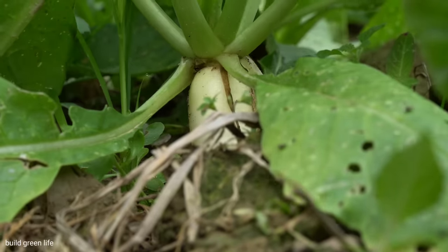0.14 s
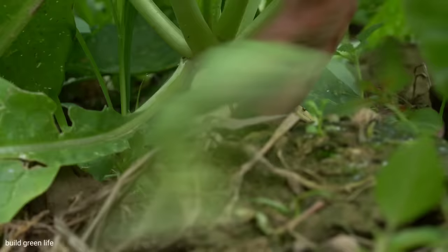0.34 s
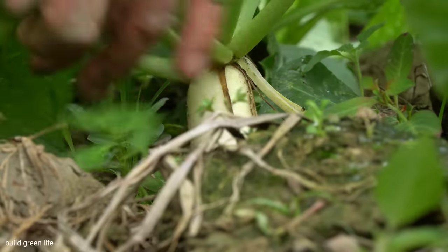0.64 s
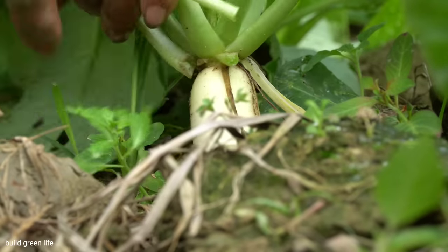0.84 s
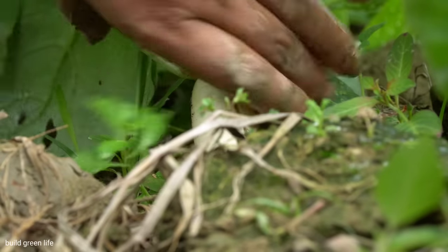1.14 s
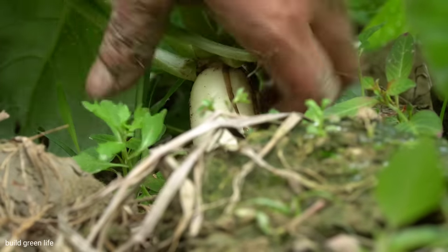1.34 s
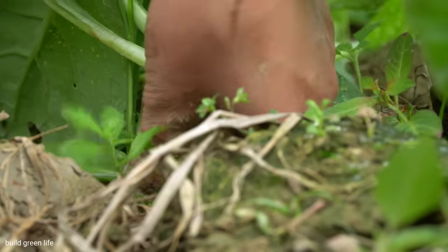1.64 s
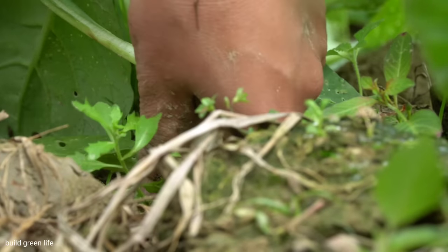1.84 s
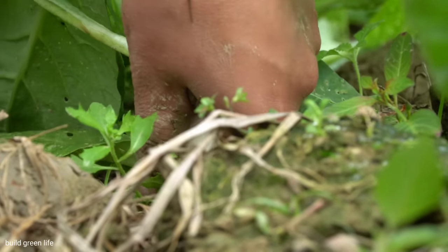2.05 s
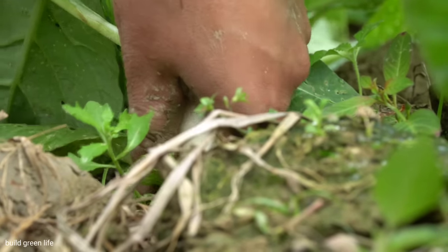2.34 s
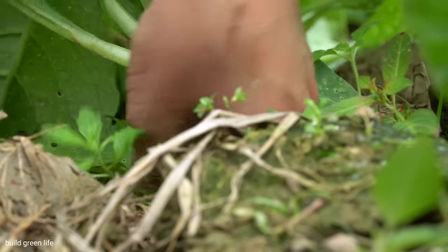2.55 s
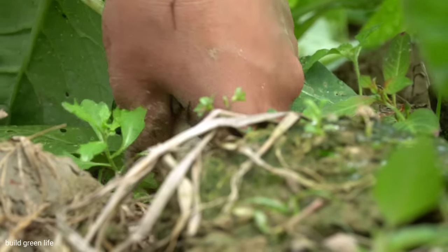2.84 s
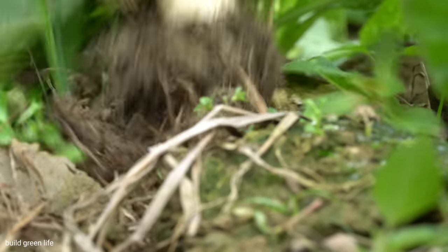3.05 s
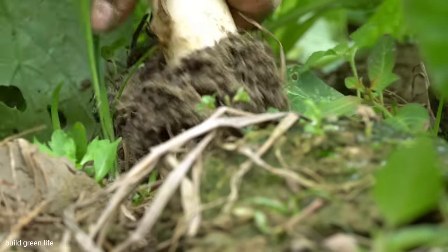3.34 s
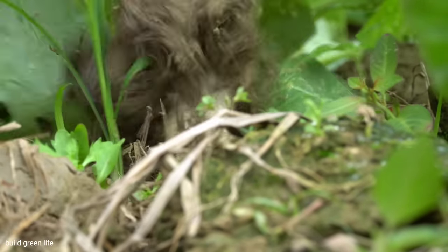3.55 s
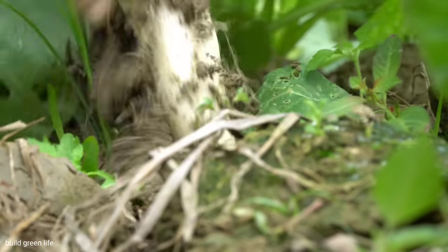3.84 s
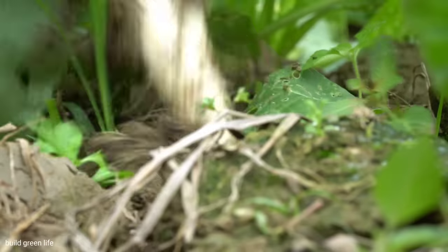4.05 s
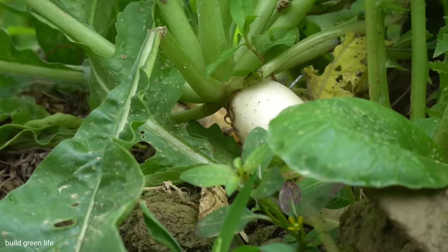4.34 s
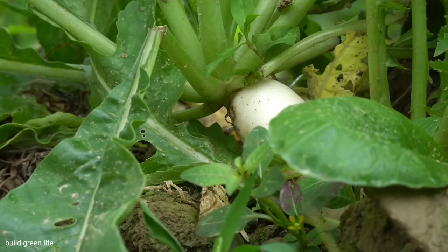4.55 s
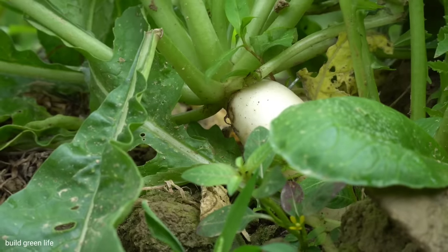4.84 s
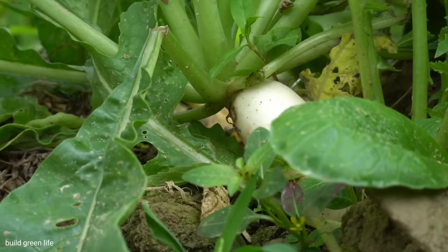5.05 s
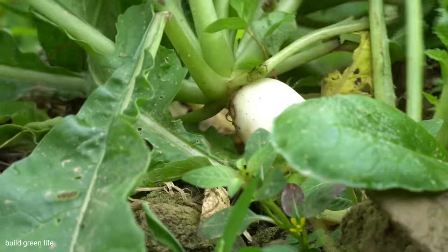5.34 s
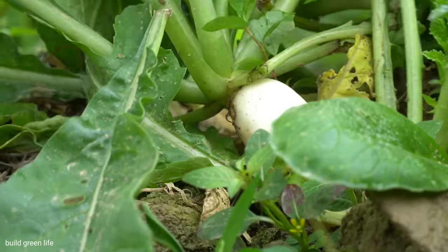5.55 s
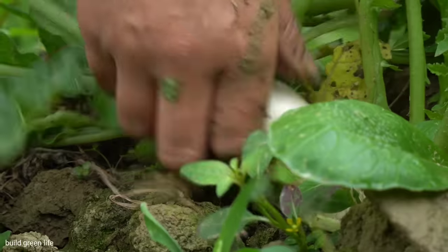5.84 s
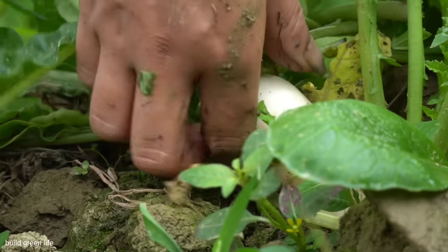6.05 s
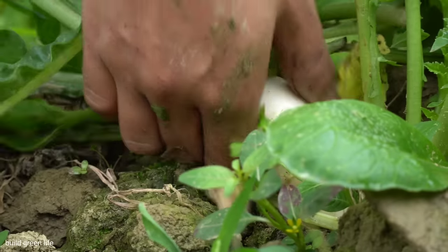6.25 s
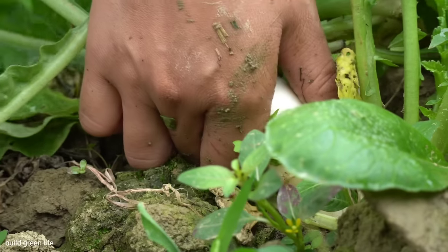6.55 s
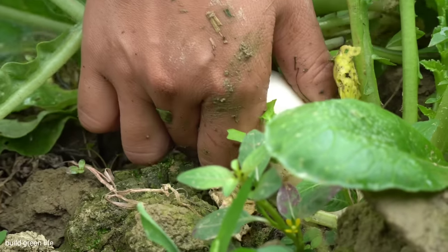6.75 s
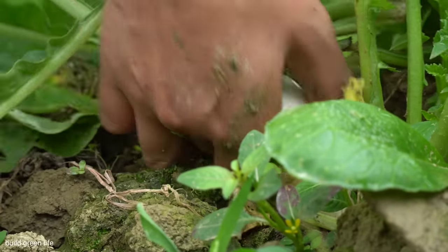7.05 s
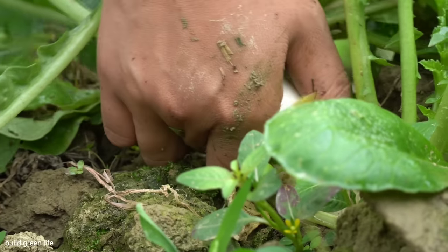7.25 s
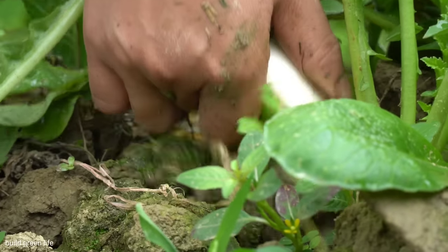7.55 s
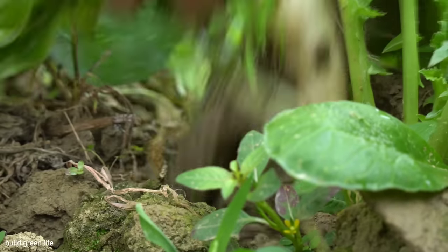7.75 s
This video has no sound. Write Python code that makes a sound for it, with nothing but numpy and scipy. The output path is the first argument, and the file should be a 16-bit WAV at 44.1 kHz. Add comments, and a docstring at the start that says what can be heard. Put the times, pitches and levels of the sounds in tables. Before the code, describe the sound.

Close outdoor sound, dry and detailed, over a low soft rumble of buffeting air. From 0 to 2.5 seconds, hands brush through leaves and scrape crumbly soil in short strokes, with small rasps, a crisp snap near 0.8 and dry woody crackles, clustered around 2.3. Rustling grows, and at 3.0 the root tears loose with a snap and a very loud, short hollow pop, then crunchy soil pours off until about 3.8. A strong rustle at 4.1 ends in three quick stalk snaps near 4.25. The rumble is heavier now and a faint wavering engine drone joins from 4.4. Quieter rubbing leads to leafy strokes from 5.3, loud bright snaps at 6.2 to 6.35, and lighter ones at 6.8 and 6.9. Faint arched bird chirps appear between 6.4 and 7.6. Light gritty straining follows, then a crackling, crunchy pull at 7.6 fades into settling crumbs.

```python
"""Radishes pulled from dry soil

Two radishes are pulled close to the microphone. Rubbing leaves and soil are shaped noise and struck resonances;
stalks and rootlets snap as bursts with a ringing mode, and the first root lets go with a pop of damped modes.
Dry crackles, crumbs and short rasps are decaying noise. Underneath are a low outdoor rumble of filtered noise,
later a distant engine drone of wavering sines and a few faint, arched bird chirps.
"""
import sys
import numpy as np
from scipy import signal
from scipy.fft import rfft, irfft, next_fast_len
from scipy.io import wavfile
from scipy.ndimage import uniform_filter1d

SR = 44100
rng = np.random.default_rng(int(sys.argv[2]) if len(sys.argv) > 2 else 0)


def waveform_to_disk(signal):
    """Save audio, clipped to [-1, 1], as 16-bit WAV at the path in sys.argv[1]."""
    frames = np.transpose(np.atleast_2d(signal))
    scaled = np.clip(frames, -1, 1) * 32767
    samples = np.round(scaled).astype(np.int16)
    wavfile.write(sys.argv[1], SR, samples)


N = 348522
TIME = np.arange(N) / SR

# outdoor background: start_s, buffeting_rms_db, far_rumble_rms_db (before its slow waver)
BACKGROUND_LEVELS = [(0, -24, -32.5), (1.2, -24.5, -32), (1.8, -24, -30.5), (3.3, -18.5, -28.5),
                     (4.6, -16.5, -27), (5.1, -17, -30.5), (6.1, -15, -26), (6.75, -21, -30),
                     (7.15, -15.5, -25), (7.9, -20.5, -23)]
# spectrum of the air buffeting: frequency_hz, gain_db
BUFFET_COLOUR = [(12, -7), (20, 17), (29, 1.5), (40, -4), (55, -6), (80, -24), (200, -58.5)]
# spectrum of the far rumble: frequency_hz, gain_db
FAR_COLOUR = [(45, 0.5), (95, 1.5), (140, -2.5), (190, -8), (250, -17), (400, -25), (900, -35),
              (2500, -34.5), (6000, -58.5), (15000, -58)]
# partials of the distant engine: mean_pitch_hz, width_hz (three standard deviations), mean_peak_db
ENGINE_PARTIALS = [(101.6, 6.14, -33.5), (124.3, 5.59, -30.5), (150.8, 5.73, -33), (253.6, 15.7, -51),
                   (306, 19.03, -51.5)]
DRONE_START_S = 4.4
# calls of a small bird: start_s, length_s, top_pitch_hz, level_db (before roughness and trim)
BIRD_CHIRPS = [(6.428, .066, 3260, -44), (6.655, 0.068, 3320, -43.5), (6.886, 0.062, 3440, -42),
               (7.22, 0.05, 3280, -41.5), (7.55, 0.053, 3120, -44)]
# leaves and clods dragging past the fingers: start_s, length_s, rms_db, pitch_hz
FINGER_FLICKS = [(0.373, 0.038, -36.5, 413), (0.552, 0.043, -31, 2720), (0.874, 0.07, -34.5, 597),
                 (1.13, .04, -39.5, 590), (1.611, 0.02, -41.5, 8300), (2.294, .04, -41, 740),
                 (2.58, 0.038, -35, 620), (2.814, 0.034, -37, 876), (3.003, 0.039, -29, 760),
                 (6.088, 0.027, -41, 8100), (7.62, 0.024, -34, 890), (7.649, 0.0092, -32, 8500),
                 (7.876, .025, -30, 440)]
# louder crackles of dry stems and crumbs: start_s, level_db, ring_hz, treble_db (re level); before trims
STEM_CRACKLES = [(0.315, -19.5, 2200, -22), (0.735, -20, 790, -13), (1.2513, -21.5, 2740, -15),
                 (1.393, -24.5, 5740, -16), (1.562, -18.5, 2390, -19), (1.994, -24, 1610, -5),
                 (2.028, -26.5, 2890, -1.5), (2.256, -16.5, 2620, -19), (2.278, -22, 1880, -20.5),
                 (2.293, -15.5, 1520, -23), (2.391, -37, 9100, -5), (3.431, -33.5, 2940, 3),
                 (3.551, -24, 2620, -13), (4.0098, -24, 870, -8.5), (4.674, -20, 2530, -27),
                 (4.792, -18, 1670, -11), (5.39, -22.5, 1770, 2), (5.62, -18.5, 8100, -27),
                 (6.035, -11, 8660, -26), (6.168, -35.5, 2000, 3), (6.277, -27, 900, -1),
                 (6.518, -24.5, 730, -14), (7.245, -18.5, 2920, -12), (7.338, -21.5, 8200, -18),
                 (7.595, -26.5, 1500, -5.5)]
# stalks and roots snapping: start_s, ring_db, ring_hz, ring_t60_s, crack_db (re ring), treble_db (re crack);
# the levels are before the trims of ring and crack
STALK_SNAPS = [(0.8170, -9.5, 2500, 0.024, 7, 3.5), (3.0045, -12.5, 905, 0.0087, 3, -22),
               (4.232, -7, 1000, 0.0068, -4, -3), (4.2544, -6, 2280, 0.0075, 1, -11),
               (4.298, -3, 2420, 0.0044, -6, -10), (6.2403, 0.5, 2550, 0.015, -7, 6),
               (6.3068, 2, 1940, 0.0027, -2.5, 1), (6.3099, -8.5, 4430, 0.01, -6, 9),
               (6.336, -7, 1530, 0.0088, 5.5, -2), (6.8184, -6.5, 895, 0.004, -13, -5),
               (6.942, -6.5, 2460, 0.016, 4, -3.5), (7.6248, -13.5, 1100, 0.0075, 7, -12),
               (7.636, -11, 1470, 0.0091, 2.5, -14), (7.6545, -18.5, 2840, 0.013, 10, 3)]
# spectrum of snaps and crumbs: frequency_hz, gain_db
BREAK_COLOUR = [(150, -11), (400, 4), (1500, 0), (2800, 2.5), (4500, 1.5), (6200, -5.5), (9000, -0.5),
                (15500, -6)]
# jerks of the tap root tearing loose: start_s, peak_db
ROOT_JERKS = [(3.0205, -15), (3.0192, -12), (3.025, -23), (3.0298, 19)]
# modes of the hollow under the root: frequency_hz, relative_db, t60_s
HOLLOW_MODES = [(193, -6.5, 0.0096), (716, 0.5, 0.0049), (1070, 11, 0.0027), (3520, -2, 0.0031),
                (6230, -11, 0.0025)]
# spectrum of the rubbing, before its bands are levelled: frequency_hz, gain_db
RUBBING_COLOUR = [(120, 7), (300, 4), (550, 3.5), (1100, -1), (1750, -4.5), (2450, -1.5), (2950, -2.5),
                  (3400, -10.5), (5300, -9.5), (6400, -19.5), (8500, -14), (12000, -20), (15500, -22)]
# strokes of hand and root through leaves and soil, in turn reaching in, feeling for a grip, drawing out the
# first root, soil pouring off it, reaching for the second, straining until it comes free:
# start_s, length_s, leaf_rustle_db, soil_scrape_db (re rustle), dry_hiss_db (re rustle)
HAND_STROKES = [ (0, 0.063, -42.5, 3, -10), (0.095, 0.15, -34.5, -6.5, -9), (0.278, 0.15, -33.5, -6.5, -7),
                (0.507, 0.097, -38.5, -5, -0.5), (0.632, 0.12, -41, 5, -4.5),
                (0.826, 0.059, -36, 1.5, -2.5), (0.886, 0.051, -33.5, -2, -4.5),
                (0.972, 0.22, -40.5, -1, -6.5), (1.28, 0.17, -38.5, -1.5, -9.5),
                (1.514, .13, -39, -2.5, -11), (1.683, 0.13, -44, 0.5, -11), (1.838, 0.049, -41.5, 1, -0.5),
                (2.033, .10, -37.5, -2.5, -4), (2.255, 0.083, -42.5, 3, -7), (2.465, 0.22, -39, -0.5, -6),
                (2.683, .14, -32.5, -2, -7), (2.82, 0.26, -39.5, -5.5, -7), (3.034, 0.11, -27.5, -2, -3),
                (3.173, 0.24, -37, 1, -7.5), (3.511, 0.24, -33.5, 0, -7), (3.585, 0.21, -30.5, -0.5, -6.5),
                (3.868, 0.19, -40.5, 1, -5.5), (4.01, 0.11, -33.5, 0.5, -7), (4.087, 0.26, -27, -.5, -7),
                (4.671, 0.084, -32.5, -3.5, -6), (4.908, 0.34, -49, 0.5, -7),
                (5.098, 0.34, -41, -2.5, -7.5), (5.308, 0.11, -36, -3.5, -8.5),
                (5.372, 0.061, -31, -1.5, -5), (5.452, 0.21, -41, -1.5, -4.5),
                (5.69, 0.12, -36, -6.5, -7.5), (5.848, 0.11, -33, -2, -4), (6.016, .075, -35.5, -2.5, 1),
                (6.156, 0.19, -40, .5, -1.5), (6.45, .19, -43.5, -2, -0.5), (6.712, 0.071, -46, -5, 3),
                (7.02, .04, -45, -5, -6), (7.084, 0.066, -40.5, 0, -5), (7.19, 0.11, -41.5, -5, -5),
                (7.266, 0.067, -39.5, -1, 4.5), (7.353, 0.22, -45.5, -10, -2),
                (7.641, 0.11, -28.5, -3, -2.5), (7.80, 0.15, -35.5, -4, -6)]
# leaves and soil settling between strokes: leaf_db, soil_db, hiss_db
SETTLING_DB = (-49.5, -51.5, -58)

PRESS_DB = 2  # the pressure swells by this much towards the middle of a stroke
UNEVEN_DB, UNEVEN_RATE = 0.63, 24  # the hand's pressure wavers (dB, steps per s)
ATTACK_SHARE, RELEASE_SHARE = 0.27, 0.34  # attack and release times as shares of a stroke's length
CRUMB_DB, CRUMB_RATE = -25.5, 55  # single crumbs: rms level at a hiss gain of 1, number per s
TICK_DB, TICK_RATE = -66, 9.3  # tiny crumbs that fall all the while: rms level, number per s
DENSE_DB = -21.5  # around this rustle level the separate grains merge into an even crunch
TOP_HZ = 15600  # upper band limit of the recorder


def undb(db):
    """Amplitude ratio: 20 dB is a factor of ten."""
    return 10 ** (np.asarray(db) / 20)


def unit(x):
    """Normalization: scale to an rms of 1."""
    return x / np.sqrt(np.mean(x ** 2))


def curves(table):
    """Linear interpolation: the columns of a control table, sample by sample."""
    s, *columns = np.transpose(table)
    return [np.interp(TIME, s, c) for c in columns]


def colour(x, points):
    """Minimum-phase filtering: gain follows the points, falls 12 dB per octave below them, holds above."""
    size = next_fast_len(N + 8192) * 2
    hz, db = np.transpose(points)
    log_f = np.log2(np.maximum(np.arange(size // 2 + 1) * SR / size, 1))
    below_octaves = np.maximum(np.log2(hz[0]) - log_f, 0)
    gain_db = np.interp(log_f, np.log2(hz), db) - 12 * below_octaves
    # folding the cepstrum onto positive times makes the filter causal
    cepstrum = irfft(np.log(undb(gain_db)))
    cepstrum[1:size // 2] *= 2
    cepstrum[size // 2 + 1:] = 0
    response = np.exp(rfft(cepstrum))
    return irfft(rfft(x, size) * response)[:N]


def band(x, lo_hz, hi_hz, order=2):
    """Band limitation: a Butterworth band-pass."""
    edges = [lo_hz, min(hi_hz, SR / 2 - 1)]
    return signal.sosfilt(signal.butter(order, edges, "band", fs=SR, output="sos"), x)


def walk(rate):
    """Slow random modulation: levels held 1 / rate s and smoothed twice, scaled to rms 1."""
    k = max(int(SR / rate), 1)
    held = rng.standard_normal(N)[np.arange(N) // k]
    return unit(uniform_filter1d(uniform_filter1d(held, k), k))


def fade(t60):
    """Exponential damping: a 60 dB fall in t60 s, cut after a tenth of a second."""
    return np.exp(-np.log(1000) * TIME[:SR // 10] / t60)


def ring(hz, t60):
    """Free vibration: one struck mode is a damped sine."""
    return np.sin(2 * np.pi * hz * TIME[:SR // 10]) * fade(t60)


def add(track, s, sound):
    """Superposition: mix a sound into a track at time s."""
    start = max(int(s * SR), 0)
    track[start:start + len(sound)] += sound[:max(N - start, 0)]


def fractures(rate, spread_db):
    """Brittle fracture: cracks at random moments, each a noise tick that dies in a few milliseconds."""
    happens = rng.random(N) < rate / SR
    kicks = happens * undb(spread_db * rng.random(N))
    envelope = np.maximum(signal.fftconvolve(kicks, fade(.011))[:N], 0)
    return unit(envelope * rng.standard_normal(N))


def outdoors():
    """Broadband turbulence and tonal radiation: air buffets over a far rumble; an engine drone joins later."""
    buffet_db, far_db = curves(BACKGROUND_LEVELS)
    buffet = unit(colour(rng.standard_normal(N), BUFFET_COLOUR)) * undb(buffet_db)
    far = unit(colour(rng.standard_normal(N), FAR_COLOUR)) * undb(far_db + 1.15 * walk(3.33))
    drone = 0
    for hz, width, db in ENGINE_PARTIALS:
        pitch = hz + width / 3 * walk(19)
        phase = 2 * np.pi * np.cumsum(pitch) / SR
        drone = drone + undb(db + 2 * walk(8)) * np.sin(phase)
    onset = np.clip((TIME - DRONE_START_S) * 10, 0, 1)  # a tenth of a second
    return buffet + far + onset * drone


def bird():
    """Frequency modulation: thin, slightly rough arched whistles, with a faint tail from the field around."""
    whistles = np.zeros(N)
    for s, length, hz, db in BIRD_CHIRPS:
        u = np.linspace(-1, 1, int(length * SR))
        pitch = hz * (1 - .08 * u ** 2)
        phase = 2 * np.pi * np.cumsum(pitch) / SR
        add(whistles, s, undb(db) * np.sin(phase) * (1 - u ** 4))
    whistles = whistles * undb(4 * walk(200))  # roughness
    tail = rng.standard_normal(SR) * np.exp(-np.log(1000) * TIME[:SR] / .6)
    diffuse = signal.fftconvolve(whistles, tail / np.linalg.norm(tail))[:N]
    return undb(-1) * whistles + undb(-8) * diffuse


def flicks():
    """Resonant friction: a leaf or clod drags over a finger and slips off, a short rasp at its own pitch."""
    out = np.zeros(N)
    rasp = fractures(rate=900, spread_db=10)
    for s, length, db, hz in FINGER_FLICKS:
        swell = np.sin(np.linspace(0, np.pi, int(length * SR)))
        resonant = unit(band(rasp, hz / 1.3, hz * 1.3))
        blade = resonant[int(s * SR):][:len(swell)]
        add(out, s, undb(db) * unit(blade * swell))
    return out


def crackles():
    """Brittle failure: dry stems and crumbs give way in a short woody burst with a bright tick on top."""
    out = np.zeros(N)
    for s, db, hz, treble_db in STEM_CRACKLES:
        burst = rng.standard_normal(SR // 10) * (fade(.011) + undb(-20) * fade(.04))
        body = band(burst, hz / 1.85, hz * 1.4)
        woody = body / np.abs(body).max() + undb(-9) * ring(hz, .018)
        tick = band(burst, 3500, 12000, order=1)
        add(out, s, undb(db) * (undb(1) * woody + undb(treble_db + 7.5) * tick))
    return out


def snaps():
    """Sudden release of strain: a juicy stalk breaks in a burst of tearing fibres, and the stub rings."""
    rings, cracks = np.zeros(N), np.zeros(N)
    for s, db, hz, t60, crack_db, treble_db in STALK_SNAPS:
        add(rings, s, undb(db) * ring(hz, t60))
        fibres = rng.standard_normal(SR // 10)
        # each band has a fast decay and a weak slower one
        body = band(fibres * (fade(0.022) + undb(-43) * fade(0.055)), 130, 2750)
        edge = band(fibres * (fade(0.0099) + undb(-23) * fade(0.071)), 5000, 13200)
        add(cracks, s, undb(db + crack_db) * (body + undb(treble_db) * edge))
    return undb(-5.5) * rings + undb(-4.5) * colour(cracks, BREAK_COLOUR)


def root_pop():
    """Impulsive excitation of a cavity: the tap root parts, and each jerk thumps the hollow beneath it."""
    out = np.zeros(N)
    thump = sum(undb(db) * ring(hz, t60) for hz, db, t60 in HOLLOW_MODES)
    thump = thump / np.abs(thump).max()
    for s, db in ROOT_JERKS:
        add(out, s, -undb(db) * thump)
    return out


def flakes(rate, spread_db, cycles, shift_db, count=44):
    """Modal resonance: leaf and soil flakes ring a few cycles at their own pitch; small ones outnumber large."""
    out = np.zeros(N)
    for hz in np.geomspace(250, 16000, count):
        smallness = np.sqrt(hz / 2000)  # rate and cycles hold at 2000 Hz and scale with this
        draws = rng.random((int(rate * smallness * N / SR), 3))
        size = undb(spread_db * draws[:, 1] ** 2) * np.sign(draws[:, 2] - .5)
        kicks = np.bincount((draws[:, 0] * N).astype(int), size, N)
        peak = signal.iirpeak(hz, cycles * smallness, fs=SR)
        ringing = unit(signal.lfilter(*peak, kicks))
        # as the contact moves on, other flakes take over
        out += np.sqrt(hz) * ringing * undb(shift_db * walk(45))
    return unit(out)


def friction(x, slip_db, slip_rate):
    """Stick-slip: contact comes in quick catches and slips, at an even mean level."""
    x = x * undb(slip_db * walk(slip_rate))
    return x / np.sqrt(uniform_filter1d(x ** 2, SR // 16))


def crumbs(rate):
    """Granular impact: single dry crumbs tick apart."""
    ticks = colour(fractures(rate, spread_db=15), BREAK_COLOUR)
    return unit(band(ticks, 1200, 14000, order=1))


def stroke_level(start, length):
    """Envelope of a stroke: attack, a swelling hold, release; long strokes start and end more gently."""
    since = TIME - start
    along = np.clip(since / length, 0, 1)
    attack = np.clip(.5 + since / (ATTACK_SHARE * length), 0, 1)
    release = np.exp(-(np.maximum(since - length, 0) / (RELEASE_SHARE * length)) ** 2)
    return attack * release * undb(-PRESS_DB * (2 * along - 1) ** 2)


def effort():
    """Power addition: strokes over the quiet settling give the gains of leaf rustle, soil scrape and hiss."""
    power = undb(SETTLING_DB)[:, None] ** 2
    for start, length, db, soil_db, hiss_db in HAND_STROKES:
        peak_power = undb([db, db + soil_db, db + hiss_db]) ** 2
        power = power + np.outer(peak_power, stroke_level(start, length) ** 2)
    return np.sqrt(power) * undb(UNEVEN_DB * walk(UNEVEN_RATE))


def rubbing():
    """Frictional noise: leaves brush and crumbs grind; hard strokes merge into a crunch, light ones crackle."""
    leaf_gain, soil_gain, hiss_gain = effort()
    ringing = flakes(rate=340, spread_db=18, cycles=12, shift_db=3.7)
    contact = ringing + undb(-8) * fractures(rate=450, spread_db=15)
    grains = friction(contact, slip_db=2.5, slip_rate=55)
    dense = fractures(rate=2500, spread_db=14)
    merged = leaf_gain ** 2 / (leaf_gain ** 2 + undb(DENSE_DB) ** 2)
    crunch = np.sqrt(1 - merged) * grains + np.sqrt(merged) * dense
    body = colour(crunch, RUBBING_COLOUR)
    soil = unit(band(body, 170, 1500, order=3))
    leaf = unit(band(body, 1500, 6000, order=3))
    hiss = unit(band(body, 6000, 17000, order=3))
    # in dB, single crumbs grow only half as fast with effort as the hiss
    grit = undb(CRUMB_DB) * np.sqrt(hiss_gain) * crumbs(CRUMB_RATE)
    falling = undb(TICK_DB) * crumbs(TICK_RATE)
    return leaf_gain * leaf + soil_gain * soil + hiss_gain * hiss + grit + falling


def scene():
    """Linear superposition: everything reaches one close microphone in the open air."""
    background = outdoors() + bird()
    breaking = crackles() + snaps() + root_pop()
    return (background + flicks() + breaking + rubbing())[None]


def record(dry):
    """Saturation and band limitation: the recorder clips the highest peaks and cuts the top."""
    clipped = np.clip(dry, -1, 1)
    return signal.sosfilt(signal.ellip(10, .2, 80, TOP_HZ, fs=SR, output="sos"), clipped)


dry = scene()
out = record(dry)
waveform_to_disk(out)
```